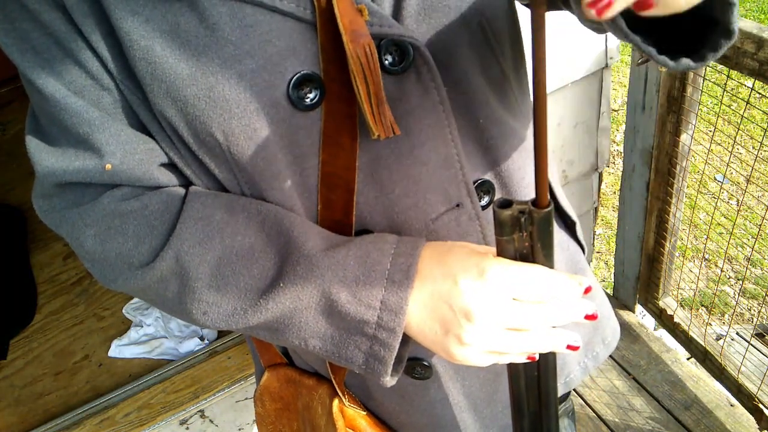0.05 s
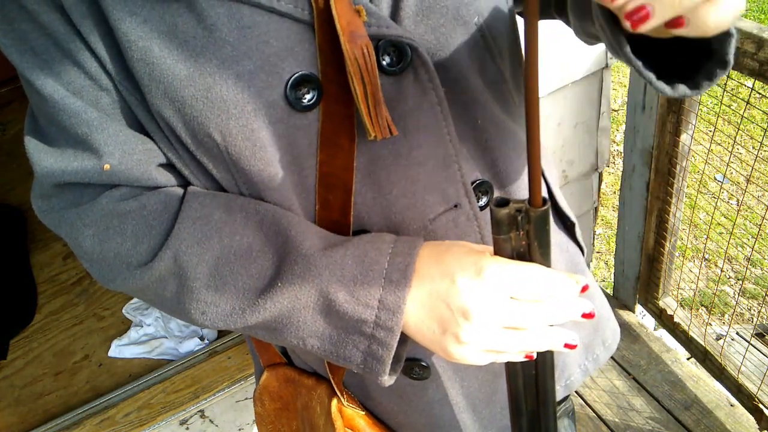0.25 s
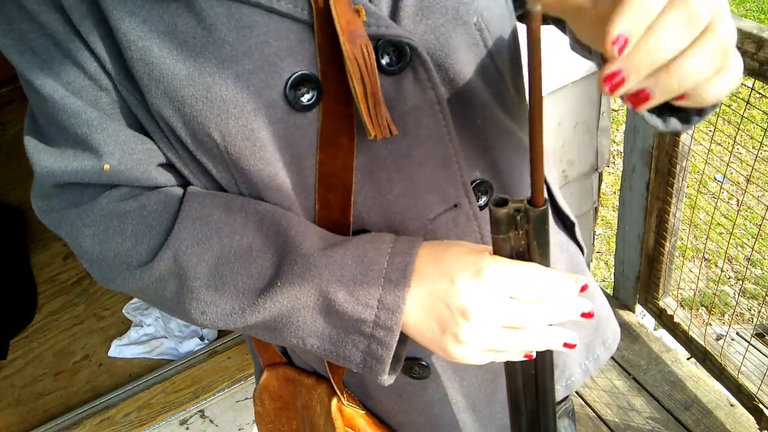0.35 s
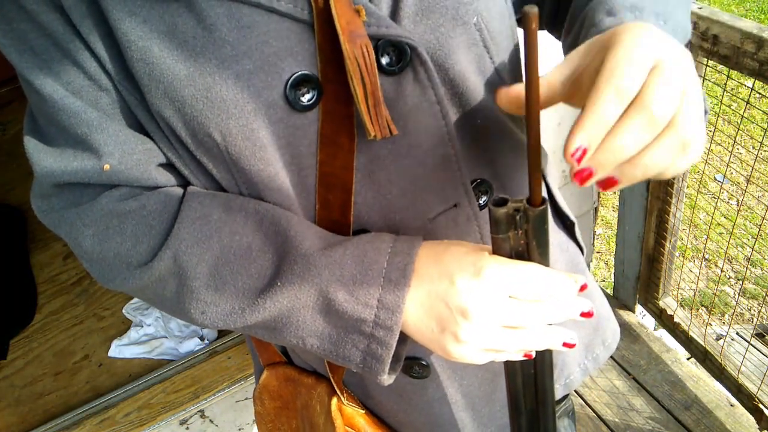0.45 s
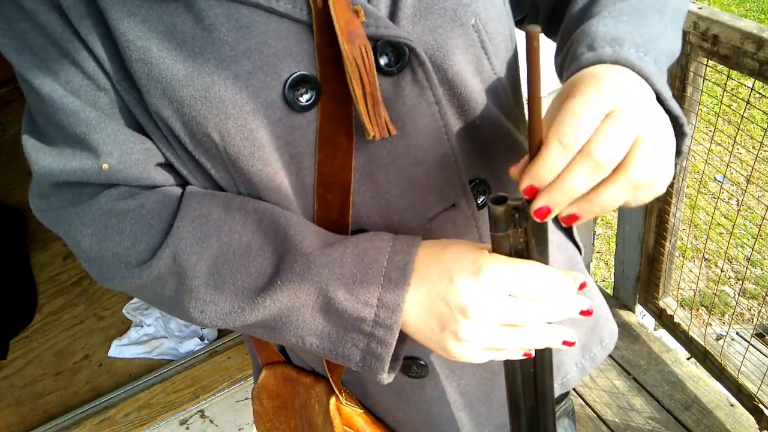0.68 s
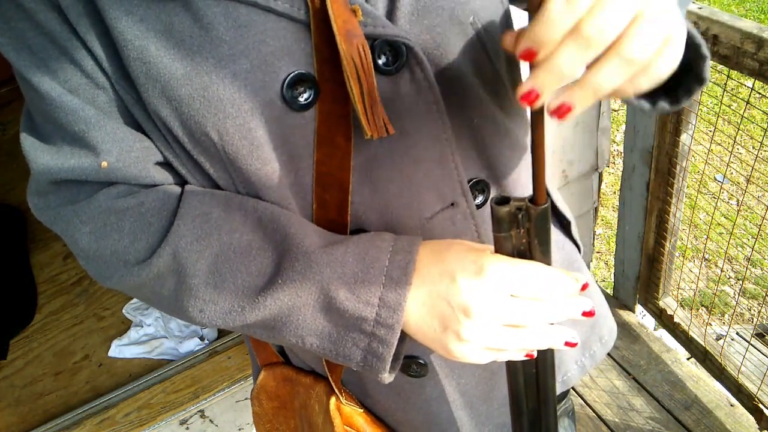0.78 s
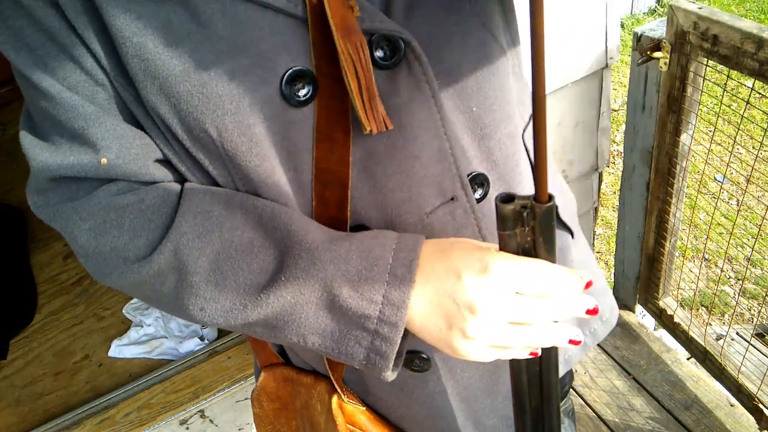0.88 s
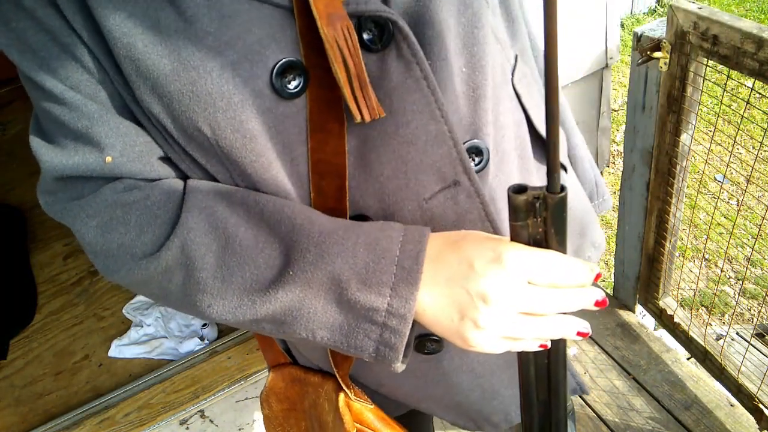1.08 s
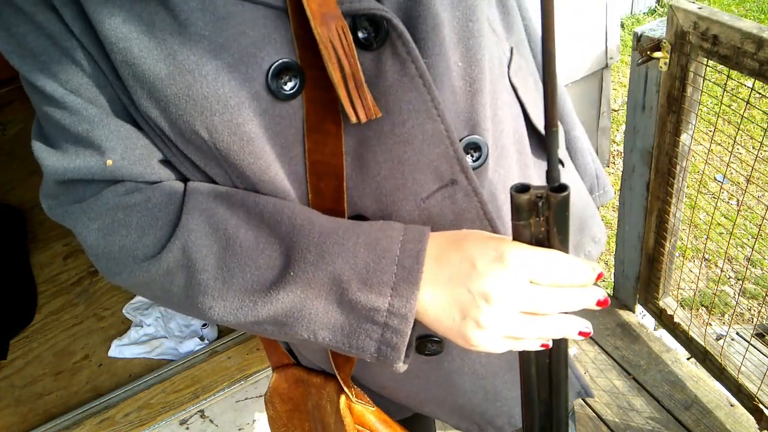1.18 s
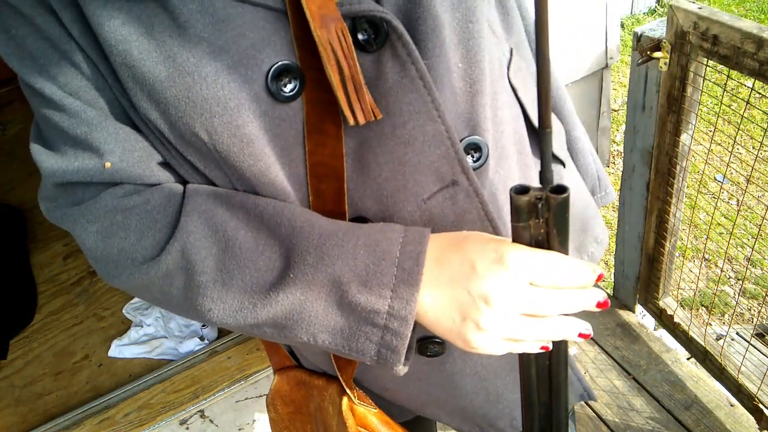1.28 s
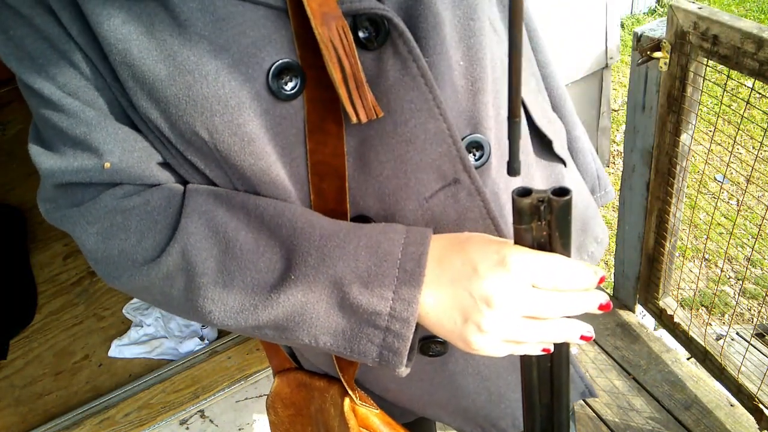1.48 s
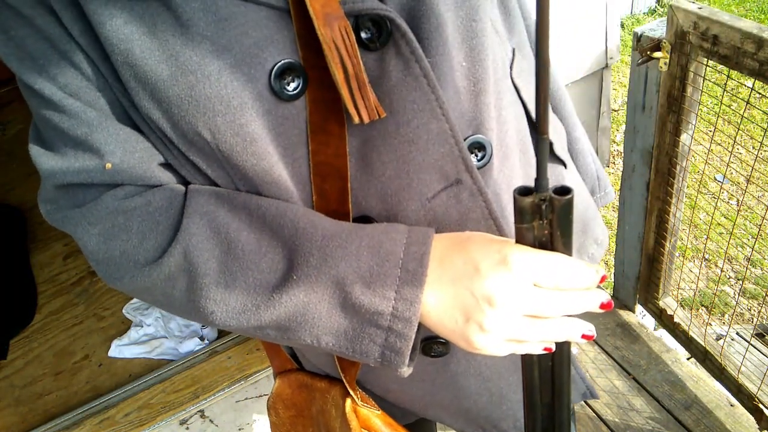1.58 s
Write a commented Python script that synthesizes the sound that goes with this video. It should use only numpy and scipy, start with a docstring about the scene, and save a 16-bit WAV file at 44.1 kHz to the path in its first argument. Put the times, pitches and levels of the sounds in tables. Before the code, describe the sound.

A ramrod strikes inside a gun barrel three times in quick succession, ringing and rattling with low thumps on a wooden deck. It then slides out with a soft scrape and light ticks, as low wind buffets the close microphone.

```python
"""Ramrod in a gun barrel

A ramrod is thrown down the barrel three times: each blow cracks and rings the steel, and the butt
thumps a wooden porch deck. The rod rattles against the bore, is drawn out with a soft, gritty
scrape and ticks on the muzzle. Low wind buffets the close microphone."""
import sys
import numpy as np
from scipy.fft import rfft, irfft, next_fast_len
from scipy.io import wavfile
from scipy.ndimage import map_coordinates

SR = 44100
rng = np.random.default_rng(int(sys.argv[2]) if len(sys.argv) > 2 else 0)


def digitize_waveform(pressure):
    """Quantize a signal to 16-bit integers and store it at the path in sys.argv[1].

    Rows of a 2-D input are taken as channels; values are limited to [-1, 1].
    """
    field = np.atleast_2d(pressure).T
    bounded = np.clip(field, -1, 1)
    quanta = np.round(bounded * 32767).astype(np.int16)
    wavfile.write(sys.argv[1], SR, quanta)


N = 72765

# blows of the rod on the load: t/s, level/dB, treble/dB, deck thump/dB, crack/dB, clunk/dB
BLOWS = [(0.2152, -19, 0, -2.5, 6, -0.5), (0.4004, -25, -3, -6, 7.5, 6), (0.5254, -30, -3, -9, 10.5, -4)]
# bending modes of the slim rod: f/Hz, level/dB
ROD_MODES = [(1170, -9), (1650, -10), (2100, -18), (2420, -16.5), (2980, -12.5), (3515, -12.5), (4080, -15),
             (4660, -20), (5260, -16.5), (5870, -9), (6520, -7.5), (7205, -2.5), (7780, -18.5)]
# modes of the porch deck: f/Hz, level/dB, t60/s
DECK_MODES = [(81.03, -4.5, 0.8), (140.6, -20.5, 0.54), (205.05, -20.5, 0.34), (264.9, -25.5, .55),
              (403.7, -33.5, 0.33)]
ROD_T60_S, ATTACK_S = 0.16, 0.0003


def amp(db):
    """Decibels to gain."""
    return 10 ** (np.asarray(db) / 20)


def unit(x):
    """Scaled to rms 1."""
    return x / np.sqrt(np.mean(x ** 2) + 1e-20)


def along(points, hz):
    """Interpolate (f/Hz, value) points on a log frequency axis."""
    f, v = np.transpose(points)
    return np.interp(np.log(hz + 1), np.log(f + 1), v)


def curve(rows):
    """One value per sample from (t/s, value) rows."""
    return np.interp(np.arange(N) / SR, *np.transpose(rows))


def wobble(rate):
    """A smooth random curve with `rate` knots a second."""
    return map_coordinates(rng.standard_normal(int(N * rate / SR) + 4), [np.arange(N) * rate / SR])


def filtered(x, response):
    """Shape x with a gain given as a function of frequency."""
    m = next_fast_len(N + 8192)
    return irfft(rfft(x, m) * response(np.fft.rfftfreq(m, 1 / SR)), m)[:N]


def noise(spectrum):
    """Noise of rms 1, coloured by (f/Hz, level/dB) points."""
    return unit(filtered(rng.standard_normal(N), lambda hz: amp(along(spectrum, hz))))


def since(start):
    """Seconds since start, zero before it."""
    return np.maximum(np.arange(N) / SR - start, 0)


def ring(t, modes, t60, colour):
    """Struck steel: modes vary per hit, beat with a weaker twin and die sooner the higher they are."""
    twin_db, twin_spread_hz = -6.5, 35
    out = np.zeros(N)
    for (hz, db), (size, phase, split) in zip(modes, rng.standard_normal((len(modes), 3))):
        angle = 2 * np.pi * hz * t + np.pi * phase
        twin = amp(twin_db) * np.sin(angle + 2 * np.pi * twin_spread_hz * split * t)
        fade_db = -60 * t / t60 * (hz / 2000) ** 0.37  # t60 holds at 2 kHz
        out += colour(hz) * amp(db + 1.6 * size + fade_db) * (np.sin(angle) + twin)
    return out


def contact_colour(treble_db, shelf_hz=5060):
    """A high shelf: makes each contact brighter or duller by its own treble value."""
    return lambda hz: amp(treble_db / (1 + (shelf_hz / (hz + 1)) ** 8))


def wind():
    """A steady outdoor rush and low buffets on the microphone."""
    # spectrum of the rush: f/Hz, relative density/dB
    air = [(100, 3.5), (160, 0), (260, -9.5), (400, -3), (560, -8.5), (850, -4.5), (1350, -10.5),
           (2070, -21), (2700, -27.5), (3600, -36.5), (4900, -50), (7200, -41), (8000, -50)]
    # spectrum of the buffets: f/Hz, relative density/dB
    rumble = [(12, 12), (28, 5.5), (50, 2.5), (80, -0.5), (130, -11), (200, -12.5), (400, -76)]
    # rise and fall of the buffeting: t/s, level/dB
    gusts = [(0, -28.5), (.16, -29), (.5, -23), (.7, -37.5), (.9, -27.5), (1.03, -27), (1.15, -31.5),
             (1.38, -32), (1.47, -22.5), (1.56, -30), (1.65, -23)]
    rush = amp(-41) * noise(air)
    buffet_db = curve(gusts) + 2.5 * wobble(rate=20)
    return rush + amp(buffet_db) * noise(rumble)


def deck_boom(width_hz=22, tilt_db_per_octave=-4):
    """Small, soft pushes keep the deck's upper modes faintly sounding."""
    # envelope of the boom: t/s, level/dB
    levels = [(0, -60), (.2, -50), (.27, -39), (.65, -32.5), (.78, -50.5), (1.0, -43.5), (1.15, -43),
              (1.35, -45.5), (1.65, -43.5)]

    def boards(f):
        return sum(amp(db + tilt_db_per_octave * np.log2(hz)) / (1 + 2j * (f - hz) / width_hz) ** 2
                   for hz, db, _ in DECK_MODES[1:])

    return amp(curve(levels)) * unit(filtered(rng.standard_normal(N), boards))


def deck_heave(t, tilt_db_per_octave=0, rise_s=0.0073):
    """The boards swell and fall back after a push."""
    # partials of the swell: f/Hz, level/dB, time to crest/s, half width/s
    partials = [(87, 1, 0.035, 0.022), (135.6, -7.5, .031, 0.029), (210, -11, 0.009, 0.017),
                (267, -26.5, .048, 0.0073), (331, -21.5, 0.0072, 0.013), (45, -15.5, .03, .025)]
    swell = np.zeros(N)
    for hz, db, crest, width in partials:
        gain = amp(db + tilt_db_per_octave * np.log2(hz / partials[0][0]))
        swell += gain * np.exp(-((t - crest) / width) ** 2) * np.sin(2 * np.pi * hz * t)
    return swell * (1 - np.exp(-t / rise_s))


def deck_thumps(hum_rise_s=0.019, damped_t60_s=0.051):
    """The butt thumps the deck, which hums on until the next blow damps it."""
    # softer jolts of the butt: t/s, level/dB, tilt/(dB per octave)
    jolts = [(.597, -12, -3.5), (0.636, -14, -4.5), (0.706, -21.5, -15), (0.994, -32, -3),
             (1.249, -30, 4.5), (1.621, -25.5, 4.5)]
    out = np.zeros(N)
    for start, _, _, thump_db, _, _ in BLOWS:
        t = since(start)
        hum = sum(amp(db - 60 * t / t60) * np.sin(2 * np.pi * hz * t) for hz, db, t60 in DECK_MODES)
        hum *= 1 - np.exp(-(t / hum_rise_s) ** 2)
        out *= amp(-60 * t / damped_t60_s)  # choke the earlier thumps
        out += amp(thump_db) * (deck_heave(t) + hum)
    return out + sum(amp(db) * deck_heave(since(start), tilt) for start, db, tilt in jolts)


def rod_scrape(grit_per_s=820, mode_width_hz=60):
    """The sliding rod rubs and catches on grit; the friction sounds in the bore and the rod's modes."""
    # envelope of the slide: t/s, level/dB
    slide = [(.68, -59.5), (.76, -55.5), (.81, -52.5), (.85, -72), (.92, -62), (.95, -48.5), (.98, -46.5),
             (1.045, -37), (1.09, -44), (1.115, -56), (1.135, -50), (1.16, -78), (1.25, -80.5)]
    # response of the bore: f/Hz, relative gain/dB
    bore = [(500, -8.5), (1050, 11), (1300, -4), (1550, 12), (1800, -1.5), (2100, 1.5), (2700, 5.5),
            (3600, -5), (4850, -13), (6000, -7), (7150, -1.5), (7900, -13)]

    def rod(f):
        return sum(amp(db) / (1 + 2j * (f - hz) / mode_width_hz) for hz, db in ROD_MODES)

    grit = (rng.random(N) < grit_per_s / SR) * amp(3 * rng.standard_normal(N))
    grainy_hiss = amp(3 * wobble(rate=300)) * rng.standard_normal(N)
    friction = unit(grainy_hiss) + amp(-1.5) * unit(grit - grit.mean())
    rub = unit(filtered(friction, lambda hz: amp(along(bore, hz))))
    sheen = amp(-12) * unit(filtered(friction, rod))
    return amp(curve(slide)) * unit(rub + sheen)


def bore_clacks():
    """The rod bumps the side of the bore: two short, hollow modes and a dry rasp around the lower."""
    # bumps: t/s, level/dB, lower mode f/Hz
    bumps = [(0.018, -43, 2657), (0.08, -42.5, 2700), (0.342, -40.5, 2240), (.637, -43, 2200),
             (0.8002, -46.5, 2650), (0.9442, -41, 2330), (1.039, -42, 2250), (1.131, -41, 2060),
             (1.252, -38, 2090), (1.627, -39.5, 2050)]
    lower_t60_s, upper_t60_s, upper_ratio, rasp_width_hz = 0.089, 0.031, 1.23, 530
    out = np.zeros(N)
    for start, db, hz in bumps:
        t = since(start)
        rasp = filtered(rng.standard_normal(N), lambda f: 1 / (1 + ((f - hz) / rasp_width_hz) ** 2))
        lower = amp(-60 * t / lower_t60_s) * (np.sin(2 * np.pi * hz * t) + amp(-3) * unit(rasp))
        upper = amp(-6 - 60 * t / upper_t60_s) * np.sin(2 * np.pi * hz * upper_ratio * t)
        out += amp(db) * (1 - np.exp(-t / ATTACK_S)) * (lower + upper)
    return out


def rod_taps(click_t60_s=0.015, fuzz_t60_s=0.15):
    """The rod touches the bore: a click with a fuzzy tail and a thin ring."""
    # touches: t/s, level/dB, treble/dB, decay time factor, click/dB
    touches = [(0.0168, -44, 3.5, 0.57, -12), (0.0773, -39.5, -4.5, 0.39, -8), (0.1628, -46, -1, 0.53, -8),
               (0.2343, -24, 0, .25, 15.5), (0.2415, -17, -35, .2, 6), (0.2552, -28, 8.5, 0.48, -8),
               (0.2908, -37, 4.5, 1.05, 13.5), (0.3188, -29.5, 2.5, 0.67, 9),
               (0.3964, -38.5, 6, 1.1, -11.5), (0.4422, -40, 3, 0.76, -3), (0.5308, -32, 10, 0.36, -12),
               (0.5592, -39, -8, 1.2, -6), (0.593, -34.5, -3, 1.1, -18.5), (0.631, -33.5, -2, 0.75, 2.5),
               (0.653, -33, -12.5, 0.29, -12), (0.7728, -45.5, -7.5, 0.75, 5.5), (.815, -51.5, 0, 0.93, -7),
               (0.865, -51.5, -11, 0.72, 0), (1.033, -42.5, 5.5, 1.8, -3), (1.121, -43, -8, 0.9, 0),
               (1.2481, -48.5, 1, 0.74, 10.5), (1.6239, -38.5, -5.5, 1, 8.5)]
    # spectrum of a light contact: f/Hz, relative density/dB
    tick_spectrum = [(300, -21.5), (1000, -10), (1600, -6), (2700, -6.5), (3600, -8), (4600, -16.5),
                     (5600, -10), (6500, 1), (7300, 4.5), (8000, -15)]
    out = np.zeros(N)
    for start, db, treble_db, length, click_db in touches:
        t, colour = since(start), contact_colour(treble_db)
        click = amp(click_db - 60 * t / click_t60_s)
        fuzz = amp(-7.5 - 60 * t / (fuzz_t60_s * length))
        tick = np.hypot(click, fuzz) * filtered(noise(tick_spectrum), colour)
        rod = amp(-1) * ring(t, ROD_MODES, ROD_T60_S * length, colour)
        out += amp(db) * (1 - np.exp(-t / ATTACK_S)) * (tick + rod)
    return out


def ramrod_blows():
    """Each blow cracks, clunks on the load, chatters for a moment and rings barrel and rod."""
    # spectrum of the rod's crack and chatter: f/Hz, relative density/dB
    chatter_spectrum = [(150, 6), (450, 1), (850, 0.5), (1100, -2.5), (1350, -9.5), (2000, -3), (2800, -6),
                        (3600, 1), (4600, -11.5), (5600, -6), (6500, -0.5), (7300, 6.5), (8000, -12)]
    # spectrum of the clunk on the load: f/Hz, relative density/dB
    clunk_spectrum = [(400, -18), (850, -22.5), (1150, 5.5), (1500, 0.5), (2500, -28), (5000, -52.5)]
    # modes of the barrel: f/Hz, level/dB
    barrel_modes = [(1090, 1), (1464, -5.5), (1712, -13.5), (2280, -13), (2650, -8), (3070, -3.5),
                    (3616, -5), (6230, -13), (6640, -6), (7430, -8.5)]
    crack_t60_s, clunk_t60_s, barrel_t60_s = 0.023, 0.039, 0.21
    sag_db_per_s, hold_s, release_t60_s = 266.5, 0.044, 0.1  # the chatter sags, then drops faster
    out = np.zeros(N)
    for start, db, treble_db, _, crack_db, clunk_db in BLOWS:
        t, colour = since(start), contact_colour(treble_db)
        crack = amp(crack_db - 60 * t / crack_t60_s)
        chatter = amp(1.5 - sag_db_per_s * t - 60 * np.maximum(t - hold_s, 0) / release_t60_s)
        grain = unit(amp(2 * wobble(rate=360)))
        clack = np.hypot(crack, chatter * grain) * filtered(noise(chatter_spectrum), colour)
        clunk = amp(clunk_db - 60 * t / clunk_t60_s) * noise(clunk_spectrum)
        barrel = amp(-6) * ring(t, barrel_modes, barrel_t60_s, colour)
        rod = amp(-13) * ring(t, ROD_MODES, ROD_T60_S, colour)
        out += amp(db) * (1 - np.exp(-t / ATTACK_S)) * (clack + clunk + barrel + rod)
    return out


def scene():
    """Everything at one close microphone; the blows push the deck downwards, hence the minus."""
    steel = ramrod_blows() + rod_taps() + bore_clacks()
    return (steel - deck_thumps() + deck_boom() + rod_scrape() + wind())[None]


def record(dry):
    """The loudest peaks are rounded off; the recorder keeps nothing above its band limit."""
    top_hz = 8050
    rounded = dry[0] / (1 + np.abs(dry[0]) ** 8) ** (1 / 8)
    return filtered(rounded, lambda hz: 1 / np.sqrt(1 + (hz / top_hz) ** 120))[None]


dry = scene()
out = record(dry)
digitize_waveform(out)
```